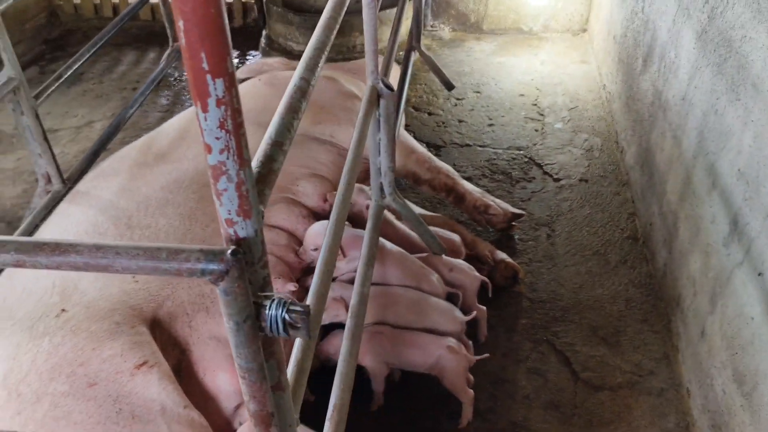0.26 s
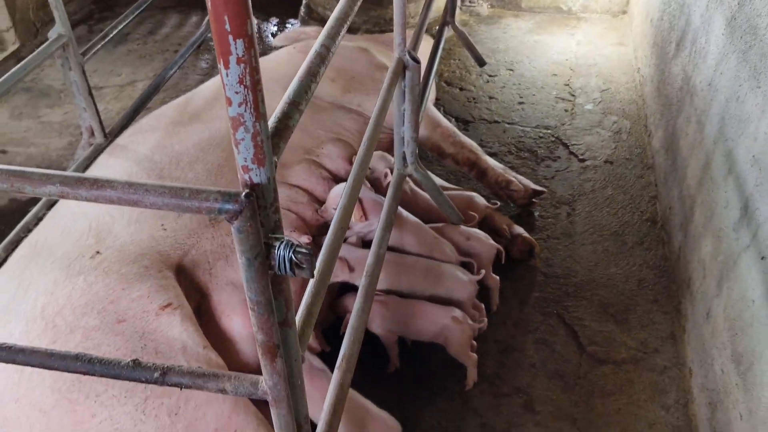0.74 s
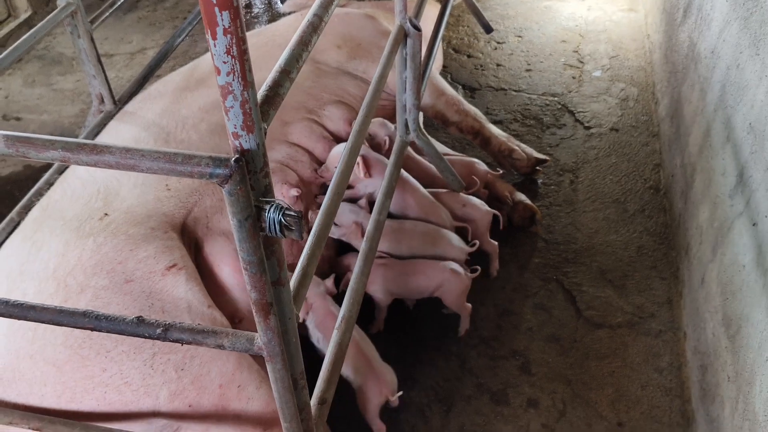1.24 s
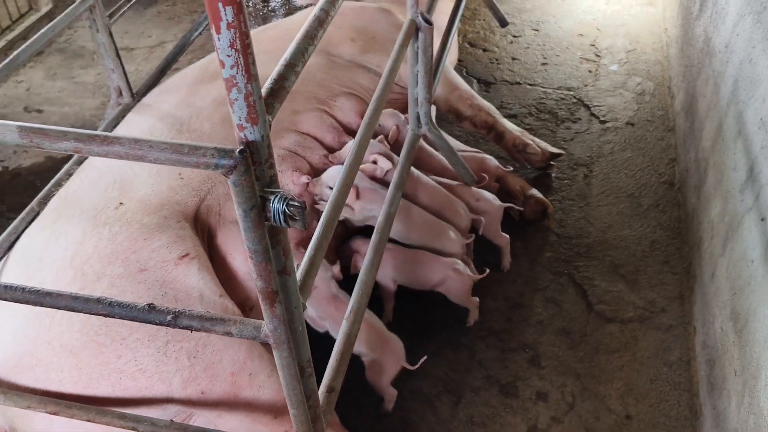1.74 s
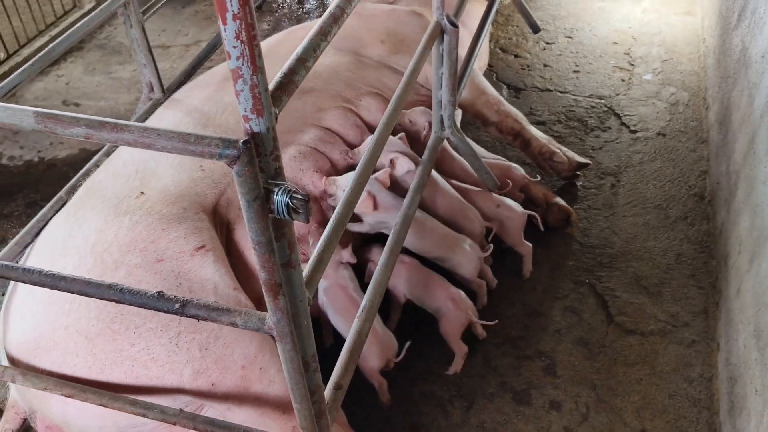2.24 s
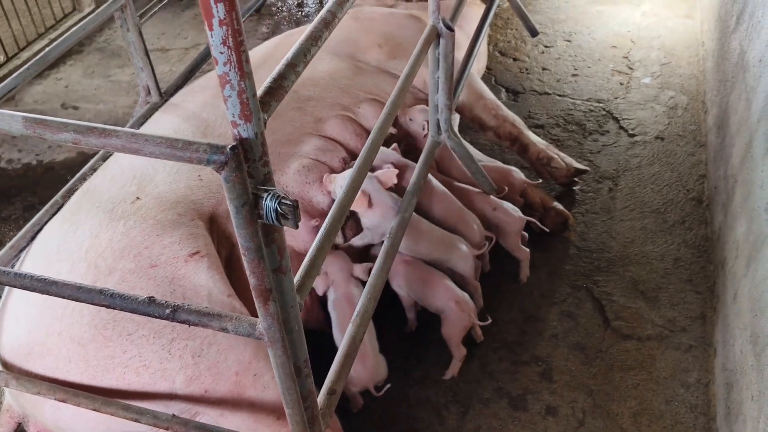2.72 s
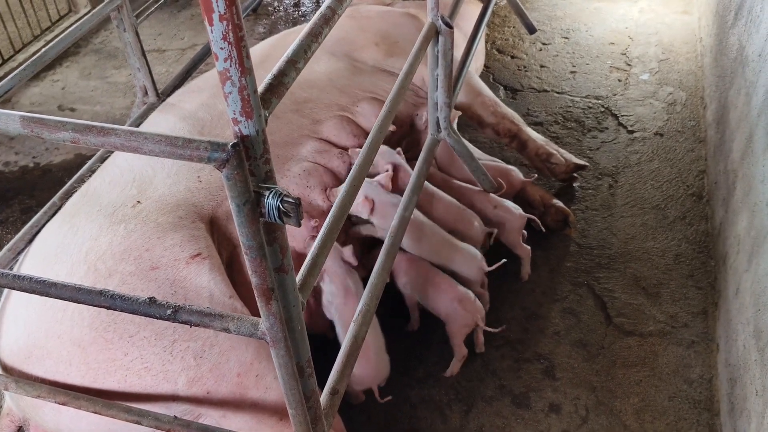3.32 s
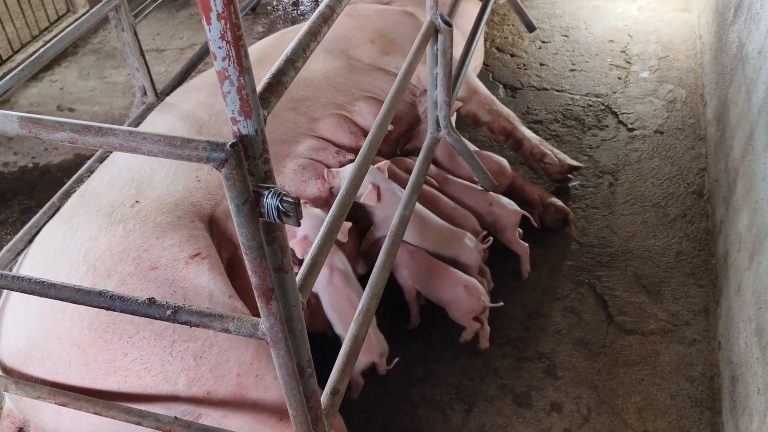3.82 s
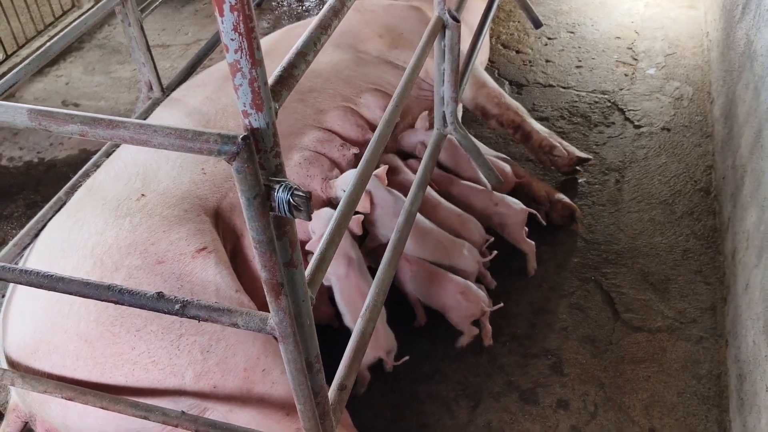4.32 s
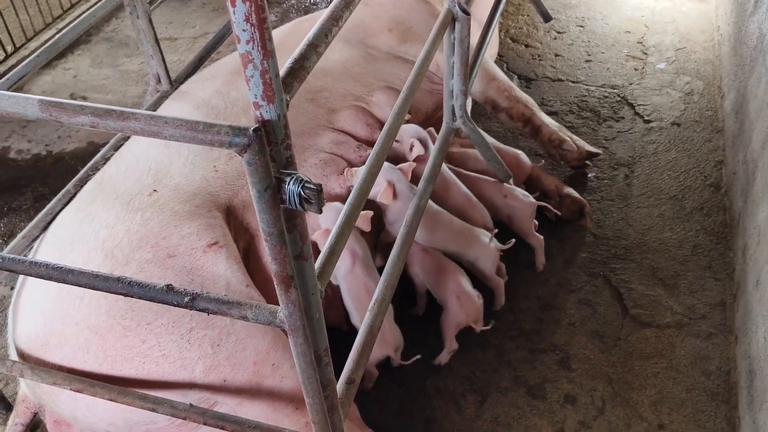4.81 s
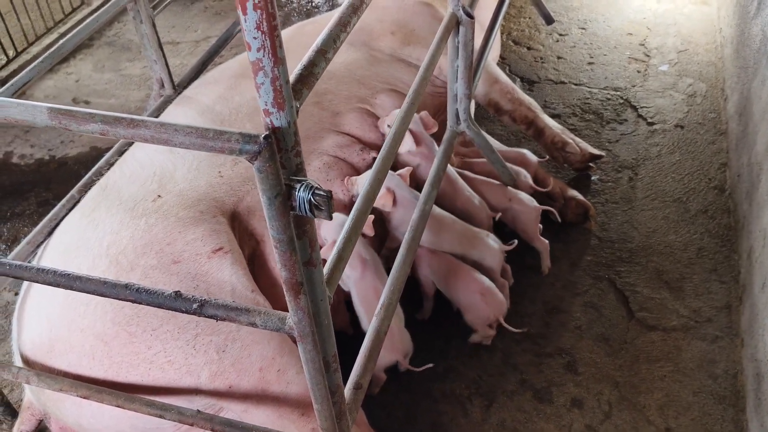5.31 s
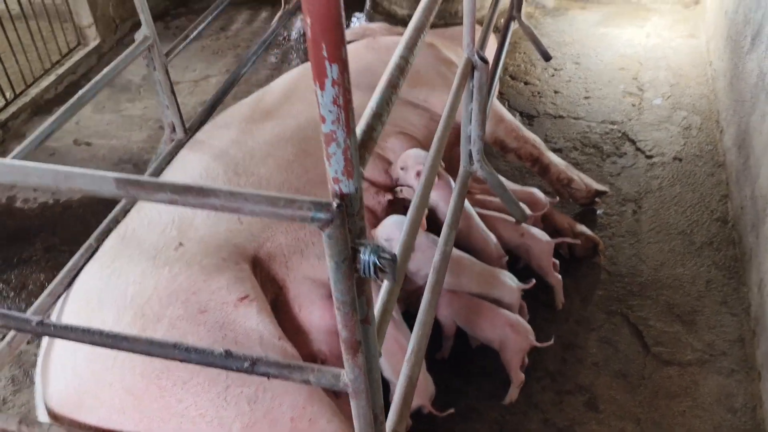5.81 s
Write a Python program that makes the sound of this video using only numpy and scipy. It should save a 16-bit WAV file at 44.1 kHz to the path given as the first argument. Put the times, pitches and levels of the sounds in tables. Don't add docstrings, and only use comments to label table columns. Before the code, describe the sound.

In a small concrete pen a big sow grunts close by, slightly to the right: short, throaty, rattling bursts about every half second, soft at first, strongest in the middle, weaker later. Piglets sniff in tiny hissy puffs and smack their lips. Two fans hum low and waver, growing louder towards the end, when one piglet squeals hoarsely. Stereo microphone nearby, short room echo.

```python
import sys
import numpy as np
from scipy import signal
from scipy.fft import rfft, irfft, next_fast_len
from scipy.io import wavfile
from scipy.ndimage import uniform_filter1d, map_coordinates

SR = 44100
rng = np.random.default_rng(int(sys.argv[2]) if len(sys.argv) > 2 else 0)


def convert_level_to_amplitude(level_db):
    exponent = np.asarray(level_db, float) / 20
    return 10 ** exponent


def master_out(mix):
    frames = np.transpose(np.atleast_2d(mix))
    ceiling = np.clip(frames, -1, 1)
    pcm = np.round(ceiling * 32767).astype(np.int16)
    wavfile.write(sys.argv[1], SR, pcm)


N = 266893
TIME = np.arange(N) / SR
SLOW = TIME[::40]

# pitch_hz [Hz], level_db [dB per Hz]
AIR_SPECTRUM = [(20, -23), (45, -7), (110, -6), (200, -2.5), (260, -13.5), (430, -16), (640, -23),
                (1740, -24.5), (2800, -28.5), (3600, -38), (7300, -41), (10500, -46), (11700, -77),
                (13000, -53)]
# time_s [s], level_db [dB]
AIR_LEVEL = [(0, -46), (.57, -44), (.8, -48), (1.45, -45.5), (1.7, -44.5), (2.7, -44.5), (3.0, -46.5),
             (4.97, -41.5), (6.05, -36)]
# pitch_hz [Hz], correlation [-1 to 1]
PORT_LIKENESS = [(60, 1), (180, 0.95), (550, -0.15), (1650, -0.49), (4970, -0.0014), (15000, 0.1)]
# pitch_hz [Hz], t60_s [s]
PEN_T60 = [(100, .2), (1000, 0.19), (4000, 0.23), (10000, 0.04)]
# pitch_hz [Hz], level_db [dB]
PORT_LEAN = [(200, 0), (600, -4), (1200, -4.5), (4000, -4)]
# time_s [s], low_fan_hz [Hz], high_fan_hz [Hz]
FAN_HZ = [(0, 175, 210), (4.2, 177, 213), (4.7, 175, 211), (5.1, 169, 206), (5.4, 167, 202),
          (6.05, 163, 196)]
# time_s [s], low_fan_db [dB], high_fan_db [dB]
FAN_LEVEL = [(0, -45.5, -56), (.5, -37, -46.5), (1.1, -40.5, -52), (1.75, -42.5, -54), (1.95, -55, -53),
             (2.5, -53, -49), (2.93, -50, -40), (3.3, -38, -43.5), (3.99, -33, -41), (4.43, -42, -36),
             (4.8, -34.5, -43), (5.34, -35.5, -42.5), (5.9, -30.5, -32), (6.05, -32.5, -42)]
# start_s [s], attack_s [s], hold_s [s], release_s [s], level_db [dB], pitch_hz [Hz]
CHIRPS = [
    (3.32, .016, .1, .045, -52.5, 5110),
    (3.82, .016, .1, .03, -56, 5080),
]
# [dB, left minus right]
SNIFFS = [(0.38, -39, 1, 0.038, -10.5), (0.415, -36.5, 0, 0.1, -13), (0.7744, -26, 2, 0.051, -7.5),
          (1.065, -41.5, 0, 0.035, -9.0), (1.5778, -41, 3, 0.035, -8.0), (1.6234, -40, 8.5, 0.071, -5),
          (1.896, -41, 9, 0.03, -4), (1.9445, -29.5, 2.5, 0.052, -9), (2.589, -42.5, 3, 0.035, -7.5),
          (2.6259, -37.5, 2, 0.042, -6.0), (3.047, -26, -7.5, 0.048, -10), (3.0695, -31.5, 5.5, 0.067, -1),
          (3.2869, -43, -20, 0.035, -11), (3.302, -41, -2, 0.035, -1), (4.1054, -35.5, 0.5, 0.035, -5),
          (4.615, -43.5, -13, 0.035, -14), (5.02, -31.5, 0.5, 0.029, -11), (5.174, -45, 9, 0.035, 1),
          (5.407, -24.5, -4, 0.021, -17.5), (5.482, -37, -13, 0.035, -9), (5.647, -34, -3, 0.041, -3.5),
          (5.8755, -36, -3, 0.035, -3.0)]
# [dB, left minus right]
SMACKS = [(1.578, -40, 0.03, -3), (1.9018, -31, 0.018, -0.5), (1.957, -34, 0.043, -8),
          (4.0274, -49, 0.024, -3.0), (4.8405, -34, 0.036, -1), (5.9863, -31, 0.025, 7)]
# start_s [s], attack_s [s], hold_s [s], release_s [s], level_db [dB]
SQUEAL = (5.79, .045, 0.17, 0.1, -32)
# time_s [s], pitch_hz [Hz]
SQUEAL_HZ = [(5.78, 975), (5.83, 1005), (5.86, 1028), (5.96, 1025), (6.05, 1015)]
# multiple [of the pitch], level_db [dB]
SQUEAL_PARTIALS = [(1.5, -12), (2, 7.5), (1.92, -8), (2.5, -12), (3, -4.5), (3.5, -18), (4, -17), (5, -24)]
# first_flap_s [s], first_gap_s [s], gap_growth_s [s per flap], flaps [count]
GRUNTS = [(.321, .0405, .004, 5), (.548, .043, .002, 5), (1.147, .037, .002, 6), (1.648, .030, .003, 6),
          (2.181, .031, .0027, 6), (2.794, .033, .0024, 6), (3.545, .0345, .0016, 6),
          (4.248, .033, .0045, 6), (5.033, .035, .0045, 6), (5.283, .0445, -.0008, 6),
          (5.539, .043, -.0003, 7)]
# full_effort_s [s], throat_db [dB], lips_part_s [s], lip_seal [0-1], widest_jaw_hz [strongest Hz]
GRUNT_EFFORT = [(.372, -27.5, 0.29, 0.13, 464), (.634, -26, .585, 0.2, 490), (1.191, -21.5, 1.15, .7, 544),
                (1.714, -17.5, 1.78, 0.98, 340), (2.25, -16.5, 2.3, 1, 370), (2.85, -18, 2.896, 1, 370),
                (3.64, -17, 3.662, 1, 420), (4.315, -21.5, 4.35, 0.79, 393),
                (5.105, -25.5, 5.105, 0.62, 440), (5.31, -28, 5.3, 0.18, 460),
                (5.555, -26, 5.48, 0.59, 440)]
LONE_FLAPS = [1.053, 1.561, 2.092, 2.149, 2.713, 3.495, 4.172]
# throat_db [dB], lips_open [0-1], nostrils_db [dB relative]
LONE_EFFORT = [(-38, .4, -16), (-38, .3, -15), (-36, .5, -14), (-32.5, 0, -4.5), (-32, 1, -12),
               (-37.5, 1, -15), (-39, 1, -11.5)]
# pitch_hz [Hz], width_hz [Hz], level_db [dB]
CHEST = [(68.3, 23.3, -2), (120.4, 25, -.5), (167, 42, -9.5)]
# pitch_hz [Hz], width_hz [Hz], level_db [dB]
THROAT = [(274.9, 85, 0), (412, 121, 0), (566.2, 104, 0)]
# [dB, three columns]
THROAT_SHAPES = [(268, -4, -8.5, -9), (418, -8.5, -5, -1), (570, -12, -8, -1.5)]
# pitch_hz [Hz], width_hz [Hz], level_db [dB]
MOUTH = [(1498, 47, -10.5), (1677.5, 72, 8.5), (1821, 97, 1.5), (2077.5, 166, -1)]
# pitch_hz [Hz], width_hz [Hz], level_db [dB]
MOUTH_WIDE = [(1660, 65, 0.5), (1790, 51, 8), (2118, 86, 0.5)]
# lips_open [0-1], level_db [dB relative]
MOUTH_DB = [(0, -41), (.3, -13.5), (1, -7)]
# pitch_hz [Hz], width_hz [Hz], level_db [dB]
SNOUT_SHUT = [(869.4, 34, 2.5), (1095.5, 27, 3)]
# pitch_hz [Hz], width_hz [Hz], level_db [dB]
SNOUT_OPEN = [(977.7, 66, 5), (1220, 140, -20)]
# pitch_hz [Hz], width_hz [Hz], level_db [dB]
SNOUT_STRAINED = [(1229, 90, -0.5), (1420, 90, -7.5)]
# sealed_db [dB relative], parted_db [dB relative]
SNOUT_DB = (-9, -5.5)
# pitch_hz [Hz], width_hz [Hz], level_db [dB]
NOSTRILS = [(2397, 98, -4), (2684, 260, 2), (3170, 186, -3.5)]
# pitch_hz [Hz], width_hz [Hz], level_db [dB]
WHISTLE = [(3844, 370, 1), (5090, 330, -2.5), (6063, 260, -6.5), (6940, 133, -12)]

RISE_DB_PER_S, SAG_DB_PER_S, RELEASE_DB_PER_S, LEAD_FALL_DB_PER_S = 147, 9.5, 191, 60
SAG_PER_SEAL_DB_PER_S, RELEASE_AHEAD_S = 56.5, 0.024
PART_S, JAW_AHEAD_S, JAW_S, JAW_REST_HZ, JAW_CLOSES_HZ_PER_S = 0.0078, 0.067, 0.029, 257, 820
GAPE_AFTER_S, GAPE_S, GAPE_SNOUT_DB = 0.076, .02, 7.5
STRAIN_S, STRAIN_DB = .035, -7.5
NOSTRIL_DB, LEAK_DB = -17, -46
POP_DB, POP_AFTER_S, POP_S = 10.5, 0.014, .08
SNORT_DB, SNORT_S = 3.5, 0.034
SIDES = np.array([[.5], [-.5]])


def unit(x):
    return x / np.sqrt(np.mean(x ** 2) + 1e-20)


def along(points, hz):
    f, v = np.transpose(points)
    return np.interp(np.log(hz + 1), np.log(f + 1), v)


def curves(*spans):
    s, *cols = np.transpose(np.concatenate(spans))
    inside = sum((TIME > rows[0][0]) & (TIME < rows[-1][0]) for rows in spans)
    return [np.interp(TIME, s, c) for c in cols] + [uniform_filter1d(inside * 1., size=600)]


def call(start, attack, hold, release, db, depth_db):
    s = start + np.cumsum([0, attack, hold, release])
    return curves(np.transpose([s, db - depth_db * np.array([1, 0, 0, 1])]))


def ease(t, width):
    return .5 + .5 * np.tanh(t / width / 2)


def wobble(rate):
    return map_coordinates(rng.standard_normal(int(N / SR * 400)), [TIME * rate])


def filtered(x, response):
    m = next_fast_len(N + SR // 4, True)
    return irfft(rfft(x, m) * response(np.fft.rfftfreq(m, 1 / SR)), m)[..., :N]


def resonant(x, modes):
    def shape(f):
        return sum(convert_level_to_amplitude(db) * (1j * f * w / (c * c - f * f + 1j * f * w)) ** 2 for c, w, db in modes)
    power = np.mean(abs(shape(np.arange(SR // 2) + .5)) ** 2)
    return filtered(x, shape) / np.sqrt(power)


def band(lo_hz, hi_hz, channels=1):
    edge = lambda f: 1 / (1 + (lo_hz / (f + 1)) ** 18) / (1 + (f / hi_hz) ** 18)
    return unit(filtered(rng.standard_normal((channels, N)), edge))


def pen(x):
    out, step, fade = np.zeros((2, N + SR)), SR // 4, SR // 40
    window = np.convolve(np.ones(step), np.ones(fade) / fade)
    for i in range(-fade, N, step):
        hz, t, z = signal.stft(rng.standard_normal((2, SR // 3)), SR, nperseg=256)
        decay = convert_level_to_amplitude(-60 * t / along(PEN_T60, hz)[:, None])
        tail = signal.istft(z * decay, SR, nperseg=256)[1]
        part = np.pad(x, (fade, step + fade))[i + fade:][:len(window)] * window
        wet = signal.fftconvolve(part[None], tail / np.linalg.norm(tail[0]), axes=1)
        out[:, i + fade:][:, :wet.shape[1]] += wet
    out = out[:, fade - SR // 300:][:, :N]
    near = lambda f: 1 / (1 + (f / 330) ** 4)
    return out - filtered((out[0] - out[1]) / 2, near) * [[1], [-1]]


def ports(x, lag):
    def response(f):
        return convert_level_to_amplitude(SIDES * along(PORT_LEAN, f)) * np.exp(-2j * np.pi * f * lag * SIDES)
    return filtered(np.array([x, x]), response)


def barn():
    barn_db, _ = curves(AIR_LEVEL)
    z = signal.stft(rng.standard_normal((2, N)), nperseg=512)[2]
    patches = uniform_filter1d(rng.standard_normal(z.shape[1:]), size=8, axis=0)
    patches = uniform_filter1d(patches, size=12, axis=1)
    pair = signal.istft(z * convert_level_to_amplitude(2.16 * unit(patches)), nperseg=512)[1][:, :N]
    turn = lambda f: np.arccos(np.clip(along(PORT_LIKENESS, f), -1, 1)) / 2
    colour = lambda f: convert_level_to_amplitude(along(AIR_SPECTRUM, f)) * [np.cos(turn(f)), np.sin(turn(f))]
    mid, side = filtered(pair, colour)
    air = unit(np.array([mid + side, mid - side])) * convert_level_to_amplitude(barn_db + 8 + 0.95 * wobble(2.95))
    wings = band(8200, 9700, channels=2)
    insects = wings * convert_level_to_amplitude(-58 + 0.23 * wobble(8.3) + np.array([[-2.5], [1.5]]))
    return air + insects


def fan(hz, db, steady, second_db):
    turn = 2 * np.pi * np.cumsum(hz) / SR
    tone = (steady + wobble(14)) * np.sin(turn) + wobble(12) * np.cos(turn)
    octave = wobble(6.1) * np.sin(2 * turn) + wobble(12) * np.cos(2 * turn)
    return convert_level_to_amplitude(db) * (unit(tone) + convert_level_to_amplitude(second_db) * ports(unit(octave), lag=0.00026))


def bird():
    level = sum(on * convert_level_to_amplitude(db) for db, on in (call(*row[:5], depth_db=16) for row in CHIRPS))
    starts, tops_hz = np.transpose(CHIRPS)[[0, 5]]
    current = np.maximum(np.searchsorted(starts, TIME) - 1, 0)
    sag_hz = 400 * np.clip(TIME - starts[current], 0, .2)
    hz = (tops_hz[current] - sag_hz) * (1 + .035 * wobble(300))
    turn = 2 * np.pi * np.cumsum(hz) / SR
    return level * (wobble(350) * np.sin(turn) + wobble(380) * np.cos(turn))


def sniffs():
    high, low = band(8770, 21700, channels=2), band(4350, 9600, channels=2)
    rustle = high * convert_level_to_amplitude(np.array([[-66], [-62]]) + 3.2 * wobble(10))
    out = np.zeros((2, N))
    for s, db, low_db, length, pan in SNIFFS:
        i = round(s * SR)
        u = TIME[:min(SR // 5, N - i)] / length
        span = slice(i, i + len(u))
        shape = convert_level_to_amplitude(db - 14.5) * (1 - np.exp(-14 * u)) * np.exp(-2.5 * u ** 2)
        out[:, span] += shape * (convert_level_to_amplitude(pan * SIDES) * high[:, span] + convert_level_to_amplitude(low_db) * low[:, span])
    return out * convert_level_to_amplitude(3.2 * wobble(150)) + rustle


def smacks():
    wet, out = band(650, 4000, channels=2), np.zeros((2, N))
    for s, db, t60, pan in SMACKS:
        i = round(s * SR)
        t = TIME[:min(SR // 10, N - i)]
        span = slice(i, i + len(t))
        out[:, span] += convert_level_to_amplitude(db - 1 - 60 * t / t60 + pan * SIDES) * wet[:, span]
    return out


def squeal():
    db, on = call(*SQUEAL, depth_db=22)
    first_db = 11.5 - 142 * np.maximum(TIME - 5.86, 0)
    turn = 2 * np.pi * np.cumsum(curves(SQUEAL_HZ)[0]) / SR

    def rough(k, steady):
        return (steady + wobble(110)) * np.sin(k * turn) + wobble(110) * np.cos(k * turn)
    upper = sum(convert_level_to_amplitude(d) * rough(k, steady=0.52) for k, d in SQUEAL_PARTIALS)
    first = convert_level_to_amplitude(first_db - 0.5) * rough(0.98, steady=1.12)
    teeth, gape = band(4300, 6400)[0], band(1300, 3800)[0]
    hiss = convert_level_to_amplitude(-16) * teeth * (1.2 + np.sin(turn)) + convert_level_to_amplitude(-10) * gape
    return on * convert_level_to_amplitude(db) * (0.55 * upper + first + hiss)


def lead(s, effort):
    db, lips, nostril_db = effort
    release_db = RELEASE_DB_PER_S * np.maximum(SLOW - s - .08, 0)
    level = db - LEAD_FALL_DB_PER_S * abs(SLOW - s) - 60 * (SLOW < s - .01) - release_db
    rest = [JAW_REST_HZ, lips, nostril_db, -6.5, .3, 0]  # jaw, lips, nostrils, snout dB, gape, strain
    return level, *np.outer(rest, np.ones(len(SLOW)))


def grunt(run, effort):
    first, gap, grow, n = run
    full, db, part, seal, wide_hz = effort
    last = first + gap * (n - 1) + grow * (n - 1) * (n - 2) / 2
    since = SLOW - part
    past = np.maximum(SLOW - last + RELEASE_AHEAD_S, 0)
    effort_db = db - RISE_DB_PER_S * np.maximum(full - SLOW, 0)
    sag_db = (SAG_DB_PER_S + SAG_PER_SEAL_DB_PER_S * seal) * np.maximum(SLOW - full, 0)
    level = effort_db - sag_db - RELEASE_DB_PER_S * past - 60 * (SLOW < first - .012)
    lips = 1 - seal * ease(-since, PART_S)
    drop_hz = (wide_hz - JAW_REST_HZ) * ease(since + JAW_AHEAD_S, JAW_S)
    jaw = JAW_REST_HZ + drop_hz - JAW_CLOSES_HZ_PER_S * past
    pop = POP_DB * seal * ease(since - POP_AFTER_S, PART_S / 2) * np.exp(-abs(since) / POP_S)
    snort = SNORT_DB * np.exp(-abs(SLOW - first) / SNORT_S)
    leak = np.minimum(LEAK_DB - effort_db, 0)
    nostril_db = lips * NOSTRIL_DB + (1 - lips) * leak + pop + snort
    gape = 1 - seal * (1 - ease(since - GAPE_AFTER_S, GAPE_S))
    strain = seal ** 3 * (1 - lips) * ease(since + STRAIN_S, 0.0068)
    swell_db = GAPE_SNOUT_DB * seal * np.maximum(ease(since, GAPE_S), .5 * strain)
    snout_db = np.interp(lips, [0, 1], SNOUT_DB) + swell_db
    return level, jaw, lips, nostril_db, snout_db, gape, strain


def voice():
    now = lead(LONE_FLAPS[0], LONE_EFFORT[0])
    for new in [*map(lead, LONE_FLAPS[1:], LONE_EFFORT[1:]), *map(grunt, GRUNTS, GRUNT_EFFORT)]:
        now = np.where(new[0] > now[0], new, now)
    return [np.interp(TIME, SLOW, control) for control in uniform_filter1d(now, size=5, axis=1)]


def palate(puff, breath):
    runs = [s + np.cumsum(np.r_[0, gap + grow * np.arange(n - 1)]) for s, gap, grow, n in GRUNTS]
    flaps = np.zeros(N)
    flaps[(np.concatenate(runs + [LONE_FLAPS]) * SR).astype(int)] = 1
    flaps[[int(run[-1] * SR) for run in runs]] = 0.55
    gate = signal.fftconvolve(flaps, convert_level_to_amplitude(-60 * TIME[:SR // 20] / 0.036))[:N]
    clicks = np.sqrt(1 - puff) * flaps * np.sqrt(SR / 25)
    puffs = np.sqrt(puff) * 4 * gate * rng.standard_normal(N)
    return clicks + puffs + breath * rng.standard_normal(N)


def sow():
    throat_db, jaw, lips, nostril_db, snout_db, gape, strain = voice()
    gape = np.clip(gape, 0, 1)
    air = convert_level_to_amplitude(throat_db)
    low, high = air * palate(puff=0.11, breath=0.11), air * palate(puff=0.56, breath=0.19)

    at, *levels = np.transpose(THROAT_SHAPES)
    throat = sum(resonant(convert_level_to_amplitude(np.interp(jaw, at, db)) * low, [mode]) for db, mode in zip(levels, THROAT))
    boom = np.roll(air * convert_level_to_amplitude(np.interp(jaw, at, [-6.5, -4, -5])), 450)
    chest = resonant(boom * palate(puff=.15, breath=0.48), CHEST)

    shut = np.interp(lips, [0, 1], [.85, .15])
    into_snout = convert_level_to_amplitude(snout_db - 2.0) * high
    snout = resonant(convert_level_to_amplitude(STRAIN_DB) * strain * into_snout, SNOUT_STRAINED)
    snout += resonant(shut * (1 - 0.77 * strain) * into_snout, SNOUT_SHUT)
    snout += resonant(np.sqrt(1 - shut ** 2) * into_snout, SNOUT_OPEN)

    into_mouth = convert_level_to_amplitude(np.interp(lips, *np.transpose(MOUTH_DB)) - 4.0) * high
    mouth = resonant(np.sqrt(1 - gape) * into_mouth, MOUTH) + resonant(np.sqrt(gape) * into_mouth, MOUTH_WIDE)

    nose = convert_level_to_amplitude(nostril_db - 3.5) * high
    nostrils = sum(resonant(convert_level_to_amplitude(db + 2.3 * wobble(13)) * nose, [(hz, width, 0)]) for hz, width, db in NOSTRILS)
    passages = (0.72 * shut + 0.2) * convert_level_to_amplitude(np.minimum(0.45 * (throat_db + 24.5), 0.5))
    whistle = resonant(nose * passages, WHISTLE)
    return throat + chest + snout + mouth + nostrils + whistle


def scene():
    (low_hz, high_hz, _), (low_db, high_db, _) = curves(FAN_HZ), curves(FAN_LEVEL)
    drone = fan(low_hz, low_db + 2.5, steady=2.65, second_db=-21.5)
    drone += fan(high_hz, high_db + 3.5, steady=0.99, second_db=-21)
    far, cry, grunts = bird(), squeal(), sow()
    direct = ports(grunts, lag=0.000558) + convert_level_to_amplitude(-1.5) * far
    direct += ports(cry, lag=-0.00039) * convert_level_to_amplitude([[2.5], [-2.5]])
    wet = pen(convert_level_to_amplitude(-4.5) * grunts + convert_level_to_amplitude(-4.5) * cry + convert_level_to_amplitude(-1.0) * far)
    return barn() + drone + sniffs() + smacks() + wet + direct


def band_limit(x):
    return signal.sosfilt(signal.butter(12, 15760, fs=SR, output="sos"), x)


def record(dry):
    mix = filtered(dry, lambda f: (1j * f / (35 + 1j * f)) ** 2)
    return band_limit(mix)


dry = scene()
out = record(dry)
master_out(out)
```